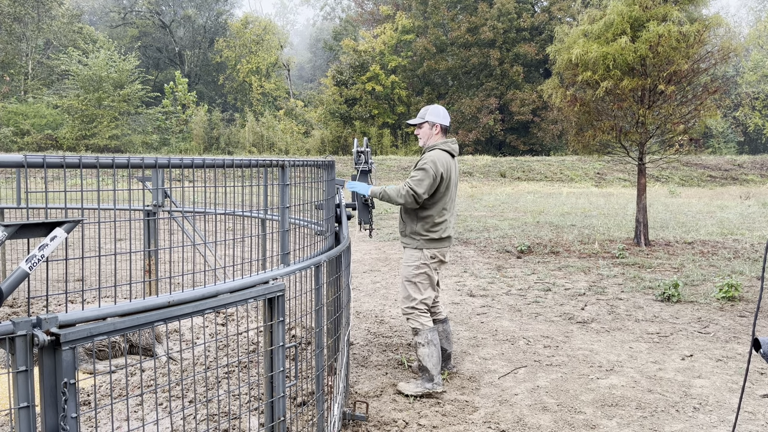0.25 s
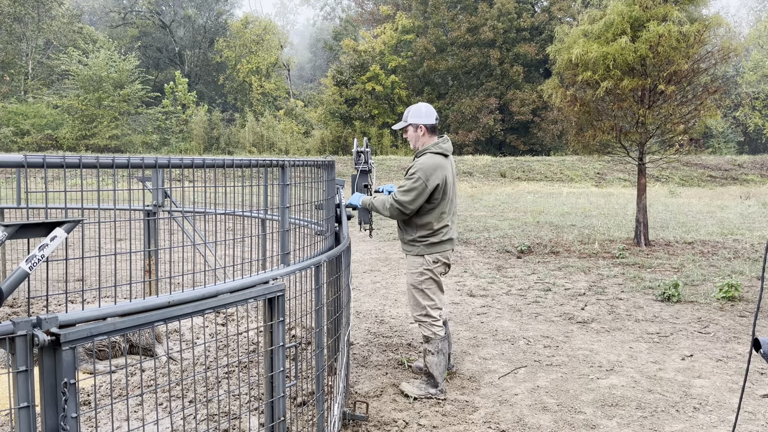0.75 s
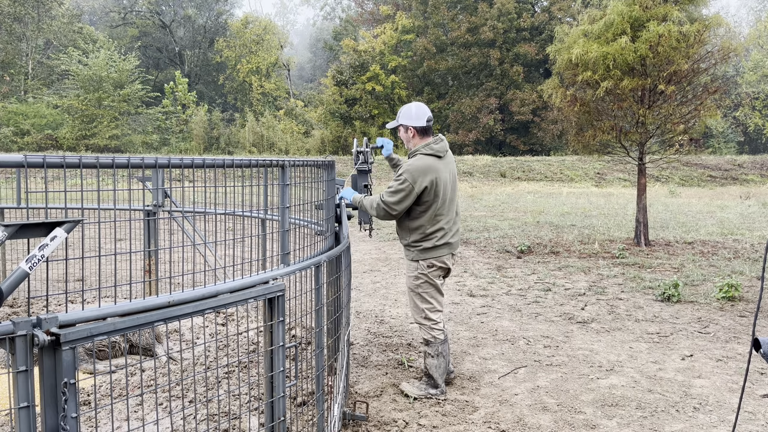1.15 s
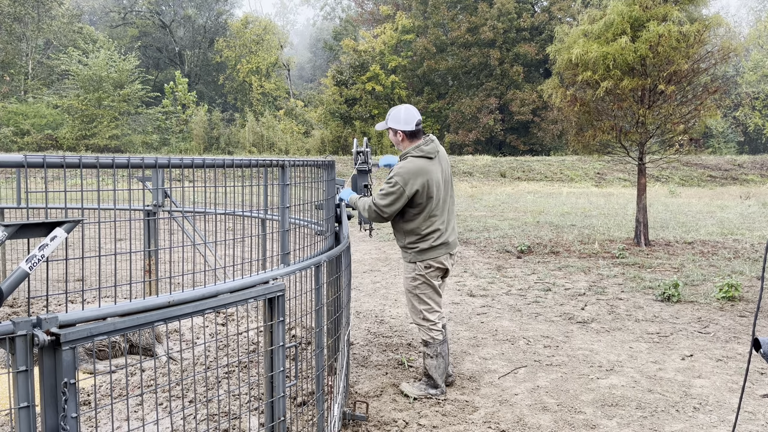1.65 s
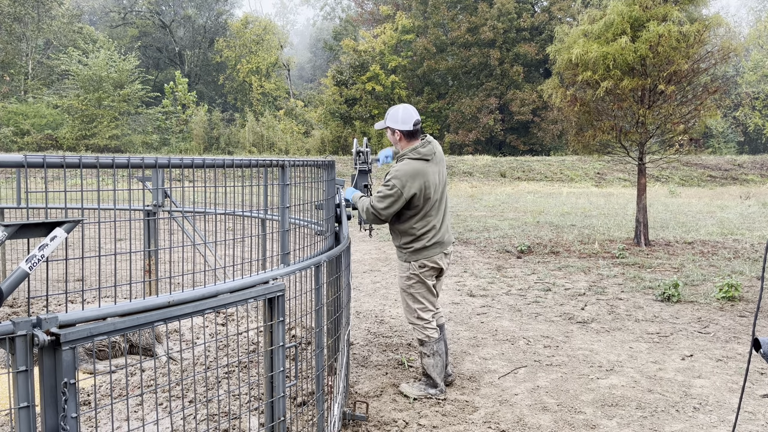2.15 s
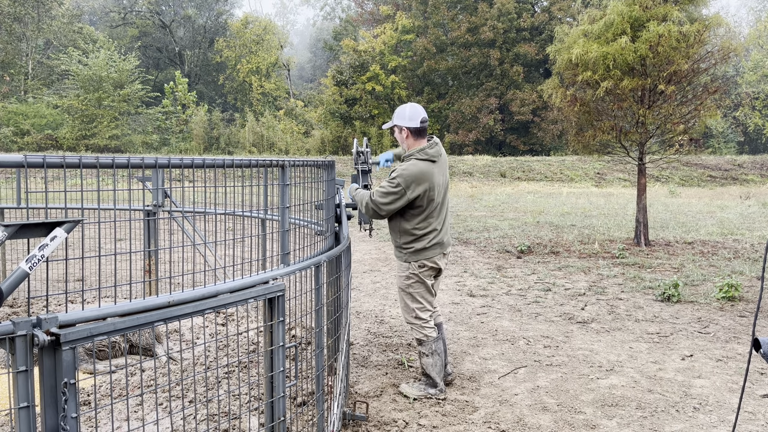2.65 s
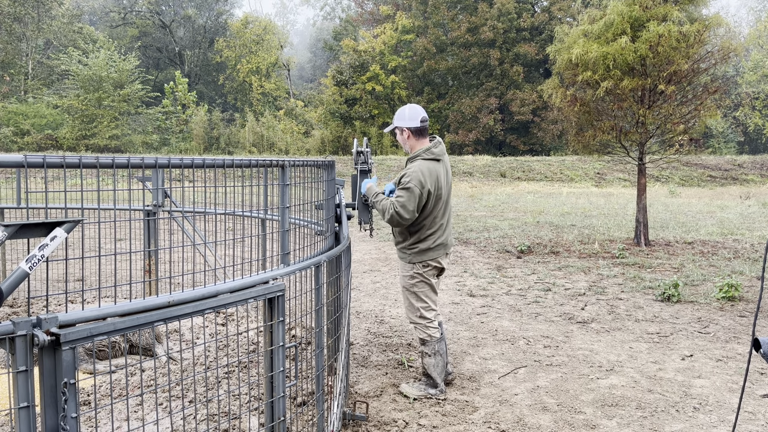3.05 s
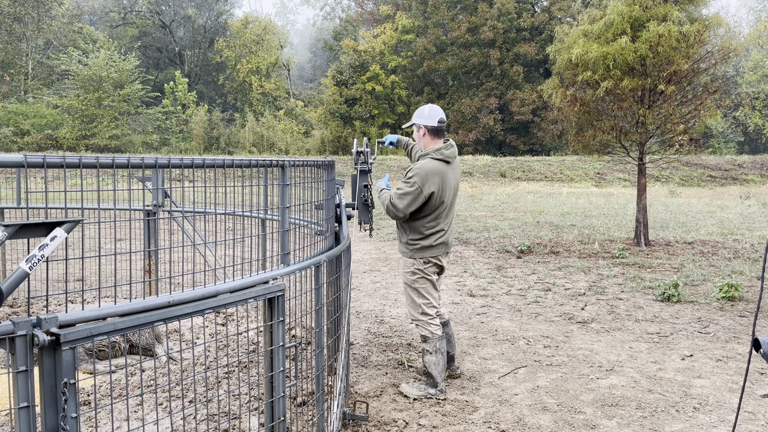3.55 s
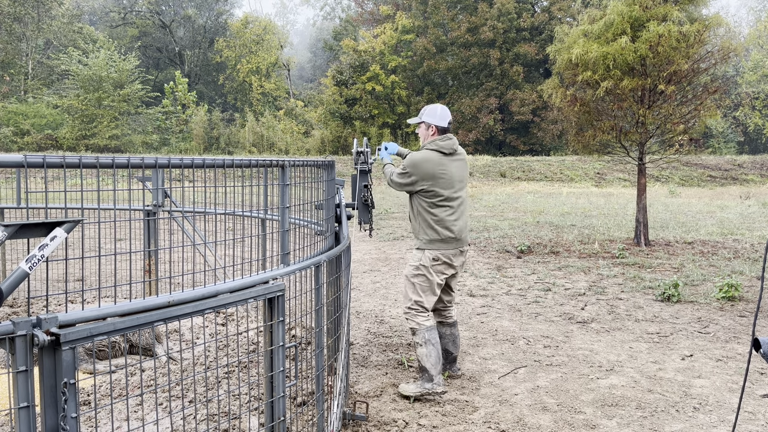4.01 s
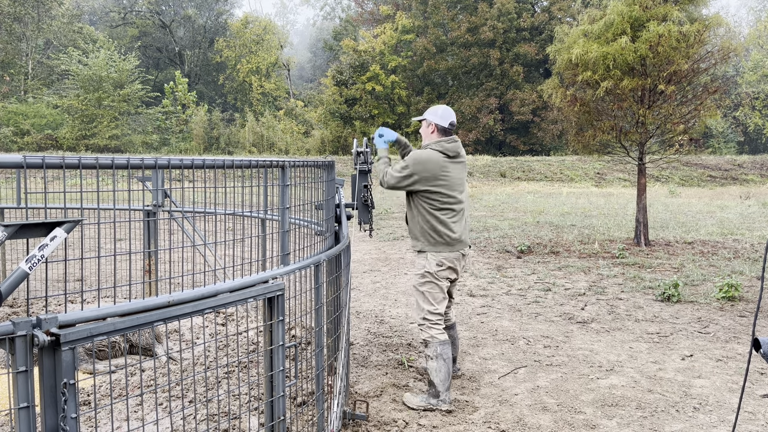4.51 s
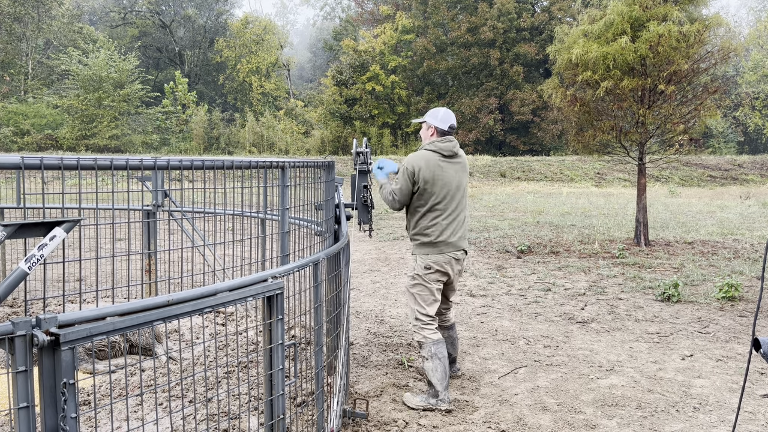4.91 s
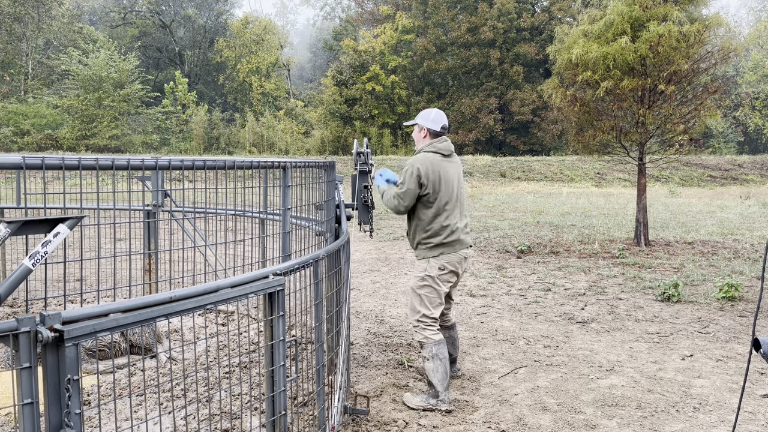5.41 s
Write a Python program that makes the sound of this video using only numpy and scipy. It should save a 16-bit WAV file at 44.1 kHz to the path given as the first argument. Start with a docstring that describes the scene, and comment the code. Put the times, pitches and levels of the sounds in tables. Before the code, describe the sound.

A hand winch on a steel pen gives one sharp metallic click, then a quickening run of ratchet clicks with a slight ring and a soft grinding beneath. It slows, pauses briefly and resumes a little louder, while a metal gate knocks and scrapes in its rails and the cable hums faintly. Light wind touches the microphone, and far insects sound faintly across the open field.

```python
"""Sharp metallic clicks, one alone and then a quickening run: a hand winch on a steel pen is cranked
in an open field. The pawl snaps over each ratchet tooth, and each impact excites the normal modes of
the frame and fence tubes, while the drum grinds with the speed. After a pause the cable takes the
gate's weight: the gate knocks and drags in its rails by stick-slip friction, and the cable hums.
Faint squeaks, a low rustle, light wind and a far insect chorus lie behind."""
import sys
import numpy as np
from scipy import signal
from scipy.fft import rfft, irfft, next_fast_len
from scipy.io import wavfile
from scipy.ndimage import uniform_filter1d

SR = 44100
rng = np.random.default_rng(int(sys.argv[2]) if len(sys.argv) > 2 else 0)


def to_wav(sig):
    """Store sig (one row per channel, or 1-D mono) as 16-bit WAV at the path in sys.argv[1].

    Samples outside -1..1 are clipped; the rate is SR.
    """
    pcm = np.clip(np.atleast_2d(sig), -1, 1) * 32767
    pcm = np.round(pcm).astype(np.int16)
    wavfile.write(sys.argv[1], SR, pcm.T)  # frames by channels


N = 250047

# Pawl drops: t/s, blow level/dB, clank level/dB
PAWL_DROPS = [(0.2857, -23, -37.5), (0.8812, -28.5, -40), (1.0356, -24.5, -34), (1.1412, -22.5, -31.5),
              (1.2245, -22.5, -29), (1.2933, -23.5, -29.5), (1.3569, -21.5, -31), (1.4138, -22.5, -28.5),
              (1.4628, -21.5, -33), (1.503, -23.5, -29.5), (1.5434, -24, -31.5), (1.592, -23, -31),
              (1.6477, -27, -36.5), (1.7078, -23.5, -33), (1.7654, -24.5, -30), (1.822, -24, -28),
              (1.8748, -22.5, -33), (1.9228, -21, -29.5), (1.965, -26.5, -30.5), (2.0051, -26, -29),
              (2.0458, -25, -33), (2.0918, -23.5, -31.5), (2.1399, -28.5, -30.5), (2.191, -24.5, -29),
              (2.2458, -23.5, -30.5), (2.2973, -22, -32), (2.3516, -25, -31), (2.4031, -22, -28.5),
              (2.4476, -22.5, -26.5), (2.489, -25.5, -27), (2.5327, -23, -29.5), (2.5851, -20.5, -28.5),
              (2.6418, -23, -25.5), (2.7049, -25.5, -28.5), (2.7725, -24.5, -29), (2.8297, -21.5, -29),
              (2.8887, -21.5, -27.5), (2.9439, -22.5, -30.5), (2.9893, -21.5, -31), (3.0284, -22, -33.5),
              (3.0677, -22.5, -35), (3.1099, -20.5, -29.5), (3.16, -25, -24.5), (3.2196, -22, -27),
              (3.2941, -23, -28), (3.3832, -24.5, -31), (3.5178, -23.5, -29.5), (4.0924, -22.5, -33),
              (4.1688, -49, -30.5), (4.2341, -21.5, -30), (4.2967, -21.5, -26), (4.3448, -20, -26),
              (4.3857, -22.5, -24.5), (4.4293, -22, -29), (4.4878, -19.5, -23), (4.5464, -17.5, -23.5),
              (4.5987, -20.5, -26), (4.6457, -17.5, -27), (4.6928, -19.5, -28.5), (4.7424, -19, -27),
              (4.7899, -20.5, -26.5), (4.8357, -18, -28), (4.8796, -20, -28), (4.9323, -18.5, -31),
              (4.9895, -19, -21), (5.0534, -20, -32.5), (5.1115, -20, -33), (5.166, -19, -29.5),
              (5.2173, -18, -28), (5.2635, -19, -30), (5.313, -19, -26.5), (5.3605, -19, -28),
              (5.4047, -17.5, -29), (5.454, -22, -32), (5.5132, -22, -30), (5.577, -21.5, -31.5),
              (5.6374, -26, -30)]
# Where the clank, blow, chime and tick of a drop lie: f/Hz
PAWL_BANDS = [1200, 3300, 4700, 9000]
# Modes of the winch frame and fence tubes: f/Hz, level/dB, T60/s
FRAME_MODES = [(531, -31.5, 0.58), (837, -12.5, 0.089), (966.4, 4, 0.037), (1085, -23.5, 0.86),
               (1203, 4, 0.033), (1462, -18.5, 0.2), (1512, 0, 0.063), (1647, -1, 0.052),
               (1993, -24.5, 0.36), (2026, -29, 0.28), (2355, -12.5, 0.14), (2677, -21.5, 0.26),
               (2873, -3, 0.052), (2988, 2, 0.046), (3232, -5, 0.089), (3285, 10.5, 0.04),
               (3387, 6.5, 0.034), (3612, -1.5, 0.051), (3980, -13.5, 0.11), (4295, 5, 0.032),
               (4674, -3.5, 0.053), (4600, -27, 0.54), (5530, -8.5, 0.054), (6340, -2, 0.049),
               (6560, -28, 0.27), (7520, 1.5, 0.023), (10100, -14, 0.052), (9650, -5, 0.03),
               (10530, -13, 0.13), (9700, -6, 0.037), (10930, -8, 0.082)]
# Noise bands of the snap: f/Hz, level/dB, rise/s, T60/s, relative fence tail level/dB, tail T60/s
SNAP_BANDS = [(676, -32.5, 0.0023, 0.042, -11.5, 0.49), (857, -13, 0.0012, 0.025, -17, 0.62),
              (1565, -4, 0.0018, 0.038, -35, 1), (2680, -12, 0.0023, 0.046, -22, 0.48),
              (2880, -17, 0.0023, 0.043, -17, 0.62), (4470, -6, 0.002, 0.044, -19.5, 0.39),
              (5980, -10.5, 0.00051, 0.029, -22.5, 0.2), (7620, -14, 0.00035, 0.046, -21, 0.44),
              (12540, -9, 0.00059, 0.028, -10.5, 0.084), (14360, -19.5, 0.001, 0.013, -16, 0.069),
              (15700, -46, 0.00048, .02, -25, .1)]
# Modes of the winch post: f/Hz, level/dB, T60/s
POST_MODES = [(1333, 0, 0.1), (1350, -10, 0.061)]
# Drops on which the post rings out clearly: t/s, level/dB
CLEAR_POST_RINGS = [(2.535, -36), (4.347, -37), (4.386, -33), (4.431, -26), (4.644, -32), (4.693, -27.5),
                    (4.791, -34), (4.988, -29), (5.166, -25.5), (5.218, -24.5), (5.266, -23.5),
                    (5.361, -37), (5.404, -25.5), (5.575, -27.5)]
# Knocks of the gate against its rails: t/s, level/dB, relative scrape level/dB
GATE_KNOCKS = [(4.065, -55, 10), (4.275, -29, -2), (4.34, -19, -9), (4.377, -15.5, -10), (4.39, -18.5, -9),
               (4.46, -33, 12), (4.494, -16, -25), (4.51, -28, -17), (4.524, -24, -26), (4.553, -18, -12),
               (4.567, -20, -18), (4.584, -21, -33), (4.9875, -15.5, -10), (5.002, -47, -13),
               (5.273, -27.5, 0)]
# Modes of the gate tubes: f/Hz, level/dB, T60/s
GATE_MODES = [(142, -34, 0.075), (575, -16.5, 0.057), (687, -3.5, 0.028), (892, -6, 0.11),
              (1000, -15, 0.18), (1350, 0, 0.027), (1432, -3, 0.053), (1750, -2.5, 0.032)]
# Drags of the gate in its rails: t/s, swell/s, hold/s, level/dB, roughness (0-1)
GATE_DRAGS = [(4.243, 0.15, 0.15, -33, 0.6), (4.982, 0.0055, .01, -34.5, .05)]
# Resonances of a fence tube and the taut cable: f/Hz, bandwidth/Hz
HUM_RESONANCES = [(599, 3), (187, 10)]
# Squeaks: t/s, length/s, turning-point f/Hz, level/dB, relative second harmonic level/dB,
# skew of the arch (1 = symmetric), share of pitch lost at the ends
SQUEAK_ARCHES = [(.59, .09, 1340, -58, -30, .6, .15), (.942, .07, 1410, -55, -30, .8, .15),
                 (3.63, .07, 760, -55, -5, 1.1, -.03)]

# Envelopes: t/s, level/dB
TUBE_ENVELOPE = [(0.75, -82), (0.93, -65.5), (1.27, -67.5), (1.32, -56), (1.43, -53), (1.76, -70.5),
                 (2.11, -52.5), (2.26, -64.5), (3.28, -54), (3.7, -69.5), (3.94, -95), (4.31, -74),
                 (4.34, -49.5), (4.92, -56), (5.61, -61.5), (5.67, -48)]
CABLE_ENVELOPE = [(4.15, -86), (4.416, -51), (4.492, -60), (4.564, -55.5), (4.864, -80), (5.194, -63),
                  (5.232, -78), (5.67, -57.5)]
RUSTLE_ENVELOPE = [(0.7, -77.5), (1.45, -56), (1.81, -66), (2.9, -72.5), (3.19, -58.5), (3.66, -85),
                   (4.09, -87), (4.42, -51), (4.88, -64), (5.28, -56), (5.67, -62.5)]
WIND_ENVELOPE = [(0.0, -73.5), (0.68, -73), (0.85, -66), (1.34, -60.5), (1.4, -65), (1.45, -80),
                 (2.32, -68.5), (2.38, -76), (3.03, -70.5), (3.92, -78.5), (4.33, -56.5), (4.59, -56),
                 (4.88, -71), (5.45, -61.5), (5.67, -68)]

# Noise spectra: f/Hz, relative spectral level/dB
DRAG_SPECTRUM = [(65, -43), (110, -55), (358, -14.5), (708, -1.5), (1120, -1.5), (1370, 3), (2020, -0.5),
                 (2140, -7), (4000, -9.5), (5180, -36), (9000, -38), (11700, -57), (19800, -120)]
GRIND_SPECTRUM = [(280, -82), (480, -5), (672, -24.5), (1020, -2), (2670, 3), (3300, 7.5), (3860, -12.5),
                  (6330, -28), (7000, -22), (9100, -52), (15400, -120)]
RUSTLE_SPECTRUM = [(150, -4), (230, -3), (450, -1), (600, 2.5), (900, -70)]
WIND_SPECTRUM = [(25, -42), (40, -5), (55, 1), (80, -2.5), (110, -8), (200, -17), (350, -15.5), (460, -16),
                 (770, -120)]
AIR_SPECTRUM = [(180, -49), (300, -25), (419, -16), (714, -12.5), (1300, -2.5), (2600, -14), (3380, -23),
                (5720, -120)]
# Bands of the far insects: f/Hz, width/Hz, relative spectral level/dB
INSECT_BANDS = [(3315, 380, 0.5), (4880, 420, -1), (5400, 1270, -6), (11000, 3300, -28.5)]

# Likeness of the two microphone ports: f/Hz, coherence (0-1)
PORT_COHERENCE = [(60, .93), (300, .88), (700, .75), (1400, .6), (2200, .65), (3300, .82), (5200, .6),
                  (6500, .8), (7600, .5), (9800, .7), (11800, .95), (14000, .5)]
# Lead of the left port: f/Hz, phase/rad
PORT_PHASE = [(20, 0), (700, .2), (2000, .5), (3300, 1.2), (4800, 1.0), (5500, 0), (7000, -.5), (8000, -3),
              (8900, -4.9), (10000, -4.3), (10800, -6.1), (12500, -6.4), (13600, -7.2), (14600, -9.4)]
# Balance of the ports: f/Hz, left minus right level/dB
PORT_BALANCE = [(60, 2.4), (600, 3), (1500, 1.5), (3000, 1.8), (4200, 3.5), (5800, 0), (7500, 4.5),
                (8900, 4.5), (9500, -3.5), (10500, 1), (11500, 0)]

USUAL_TEETH_PER_S, USUAL_BLOW_DB = 20, -21.5


def pawl():
    """Impact excitation: each drop gives a noisy snap and sets the frame and post in free vibration."""
    t = np.arange(12288) / SR
    times, blow, clank = np.transpose(PAWL_DROPS)
    # Faster cranking and harder blows strengthen the treble; levels in dB.
    faster, harder = crank_speed(times) - USUAL_TEETH_PER_S, blow - USUAL_BLOW_DB
    chime = -24.5 + 0.22 * faster + 0.69 * harder
    tick = -29.5 + 0.28 * faster + 0.27 * harder
    chime, tick = [chime, tick] + rng.standard_normal((len(times), 2)).T
    post_db = -43.5 + 4 * rng.standard_normal((len(times), 1))
    drop_db = np.c_[clank, blow, chime, tick]
    mode_hz = np.array(FRAME_MODES)[:, 0]
    rises = at_hz(np.array(SNAP_BANDS)[:, [0, 2]], mode_hz)  # each mode swells as fast as its band
    frame = modal_ring(FRAME_MODES, excitation(drop_db, mode_hz) - 3.5, t, rises,
                       scatter_db=2, detune=0.99)
    faint_post = modal_ring(POST_MODES, post_db, t, [.002, .002], scatter_db=5, detune=0.38)
    return placed(times - .0006, frame + faint_post + pawl_snap(drop_db, t))


def pawl_snap(drop_db, t):
    """Broadband transient: each band dies quickly and leaves a slower, resonant tail in the fence."""
    hz, centres = np.fft.rfftfreq(len(t), 1 / SR), np.array(SNAP_BANDS)[:, 0]
    noise = rfft(rng.standard_normal((len(drop_db), 2, len(t))).transpose(1, 0, 2))
    noise[..., (hz < 350) | (hz > 17000)] = 0
    fence = 1.13 + sum(1 / (1 + ((hz - f) / 25) ** 2) for f, _, _ in FRAME_MODES)
    out = 0
    for k, (f, db, rise, t60, tail_db, tail_t60) in enumerate(SNAP_BANDS):
        share = at_hz(np.c_[centres, np.arange(len(centres)) == k], hz)  # neighbouring bands overlap
        band = noise * np.sqrt(share)
        snap = unit_rms(irfft(band)) * strike(t, rise, t60)
        tail = unit_rms(irfft(band * fence)) * strike(t, rise, tail_t60)
        out += amp(excitation(drop_db, np.array([f])) + db + 5) * (snap + amp(tail_db) * tail)
    return out


def excitation(drop_db, hz):
    """Excitation spectrum: the level/dB of each drop at hz, interpolated between its four bands."""
    return np.array([at_hz(np.c_[PAWL_BANDS, levels], hz) for levels in drop_db])


def crank_speed(t):
    """Rate as reciprocal period: teeth a second, from the gap between the drops either side of t."""
    times = np.array(PAWL_DROPS)[:, 0]
    return np.r_[1, 1 / np.diff(times), USUAL_TEETH_PER_S][np.searchsorted(times, t)]


def post():
    """Free vibration: on some drops two close modes of the winch post ring out clearly."""
    rows, t = np.array(CLEAR_POST_RINGS), np.arange(12288) / SR
    ring = modal_ring(POST_MODES, rows[:, 1:], t, [.002, .002], scatter_db=0, detune=0.43)
    return placed(rows[:, 0], ring)


def gate_knocks():
    """Impact on damped tubes: each dull knock rings the gate's modes and adds a short scrape."""
    rows, t = np.array(GATE_KNOCKS), np.arange(8192) / SR
    times, knock_db, scrape_db = rows[:, 0], rows[:, 1:2], rows[:, 2:3]
    ring = modal_ring(GATE_MODES, knock_db - 6, t, [.0007] * len(GATE_MODES), scatter_db=2.5, detune=.5)
    noise = rng.standard_normal((len(rows), 2, len(t))).transpose(1, 0, 2)
    band = signal.sosfilt(signal.butter(2, [900, 6000], "band", fs=SR, output="sos"), noise)
    scrape = band * amp(knock_db + scrape_db) * strike(t, rise=0.0011, t60=0.14)
    return placed(times - .001, ring + scrape)


def gate_drag():
    """Stick-slip friction: noise broken into uneven jolts; each drag swells, holds and fades."""
    start_db, fall_db_per_s = -23, 115
    slips = jolts(per_s=330, spread_db=3.5, fade_s=0.0074)
    t, level = np.arange(N) / SR, 0
    for start, rise, hold, db, rough in GATE_DRAGS:
        swell_db = start_db * np.clip(1 - (t - start) / rise, 0, 1)
        fade_db = fall_db_per_s * np.maximum(t - start - rise - hold, 0)
        level += amp(db + swell_db - fade_db) * (t > start) * (1 - rough + rough * slips)
    return level * hiss(DRAG_SPECTRUM, patchy_db=1.5)


def drum_grind():
    """Friction noise of drum and cable: it grows with speed and settles when the crank stops."""
    db_per_doubling, settle_db_per_s, smooth_s = 8.5, 50, 0.11
    t = np.arange(N) / SR
    doublings = uniform_filter1d(np.log2(crank_speed(t) / USUAL_TEETH_PER_S), round(smooth_s * SR))
    level_db = -47 + db_per_doubling * doublings
    settled_db = np.maximum.accumulate(level_db + settle_db_per_s * t) - settle_db_per_s * t
    rattle = .5 + .5 * jolts(per_s=270, spread_db=-1.5, fade_s=.004)
    return amp(settled_db) * rattle * hiss(GRIND_SPECTRUM, patchy_db=4.5)


def tube_and_cable():
    """Forced resonance: random shaking keeps a fence tube and the taut cable humming."""
    out, t = 0, np.arange(N) / SR
    for levels, (hz, width) in zip((TUBE_ENVELOPE, CABLE_ENVELOPE), HUM_RESONANCES):
        shake = rng.standard_normal((N, 2, 2)).T
        slow = signal.lfilter([1], [1, -np.exp(-np.pi * width / SR)], shake[0] + 1j * shake[1])
        steady = slow / (abs(slow) + 0.4 * np.std(slow))  # the ring rarely dies out
        out += envelope(levels) * unit_rms((steady * np.exp(2j * np.pi * hz * t)).real)
    return out


def squeaks():
    """Frequency and amplitude modulation: brief tones glide along an arch, fuzzy with random wobble."""
    out = 0
    for start, length, turning_hz, db, overtone_db, skew, sag in SQUEAK_ARCHES:
        along = np.clip((np.arange(N) / SR - start) / length, 0, 1)
        off_peak = 1 - np.sin(np.pi * along ** skew)
        wobble, flutter = uniform_filter1d(rng.standard_normal((N, 2)), size=200, axis=0).T
        hz = turning_hz * (1 - sag * off_peak) * (1 + .15 * wobble)
        phase = 2 * np.pi * np.cumsum(hz) / SR
        tone = np.sin(phase) + amp(overtone_db) * np.sin(2 * phase)
        level = amp(db - 11 * off_peak) * (along > 0) * (along < 1)
        out += level * tone * amp(3.8 * unit_rms(flutter))
    return out


def rustle():
    """Amplitude-modulated noise: a low rustle comes and goes during the cranking."""
    return envelope(RUSTLE_ENVELOPE) * hiss(RUSTLE_SPECTRUM, patchy_db=2.7)


def wind():
    """Low-frequency pressure fluctuation: light wind and handling rumble at the microphone."""
    return envelope(WIND_ENVELOPE) * hiss(WIND_SPECTRUM, patchy_db=1.8)


def insects():
    """Incoherent addition: the broad bands of a far chorus and dull air noise sum in power."""
    hz = np.geomspace(150, 17000, num=200)
    chorus = sum(amp(2 * db) * np.exp(-((hz - f) / width) ** 2 * 2) for f, width, db in INSECT_BANDS)
    air = amp(2 * (at_hz(AIR_SPECTRUM, hz) - 5.5))
    spectrum = np.c_[hz, 10 * np.log10(chorus + air + 1e-9)]
    return amp(-57) * hiss(spectrum, patchy_db=2.8)


def modal_ring(modes, blow_db, t, rises, scatter_db, detune):
    """Modal superposition: damped sinusoids whose strength and phase vary from blow to blow."""
    hz, db, t60 = np.transpose(modes)
    chance = rng.standard_normal((len(blow_db), len(hz), 3))
    phasors = np.exp(2j * np.pi * chance[..., 1:]).transpose(2, 0, 1)
    gains = amp(blow_db + db + scatter_db * chance[..., 0]) * phasors
    fades = np.array([strike(t, rise, decay) for rise, decay in zip(rises, t60)])
    out = np.zeros((2, len(blow_db), len(t)))
    # Six kinds of contact shift the modes in proportion to their bandwidth.
    for k, shift in enumerate(rng.standard_normal((6, len(hz)))):
        pitch = hz + detune * shift * 2.61 / t60
        out[:, k::6] = (gains[:, k::6] @ (fades * np.exp(2j * np.pi * pitch[:, None] * t))).real
    return out


def strike(t, rise, t60):
    """Delayed onset and damping: slow waves arrive late and steeply, then fall 60 dB in t60."""
    return (1 - np.exp(-1.4 * t / rise)) ** 6 * amp(-60 * t / t60)


def jolts(per_s, spread_db, fade_s):
    """Shot noise: randomly timed bumps of uneven height, each decaying exponentially."""
    slips = (rng.random(N) < per_s / SR) * amp(spread_db * np.minimum(rng.exponential(1, N), 4))
    return unit_rms(signal.lfilter([1], [1, -np.exp(-1 / (fade_s * SR))], slips))


def hiss(spectrum, patchy_db):
    """Spectral shaping: two uncorrelated noises share one spectrum with drifting patches of level."""
    frames, hz = N // 256 + 5, np.fft.rfftfreq(1024, 1 / SR)
    a, b, c, d, patches = rng.standard_normal((frames, 513, 5)).T
    patches = unit_rms(uniform_filter1d(uniform_filter1d(patches, size=10, axis=0), size=14, axis=1))
    gain = amp(at_hz(spectrum, hz)[:, None] + patchy_db * patches)
    shaped = np.array([a + 1j * b, c + 1j * d]) * gain
    return unit_rms(signal.istft(shaped, nperseg=1024, noverlap=768)[1][:, :N])


def placed(times, sounds):
    """Linear superposition of sounds (2, events, samples), each at its time."""
    out = np.zeros((2, N + sounds.shape[2]))
    for k, start in enumerate(times):
        out[:, round(start * SR):][:, :sounds.shape[2]] += sounds[:, k]
    return out[:, :N]


def envelope(points):
    """Gain per sample, interpolated in decibels and silent outside the table."""
    times, db = np.transpose(points)
    return amp(np.interp(np.arange(N) / SR, times, db, left=-150, right=-150))


def at_hz(points, hz):
    """Interpolation on a logarithmic frequency axis."""
    f, value = np.transpose(points)
    return np.interp(np.log(hz + 1), np.log(f + 1), value)


def amp(db):
    """Amplitude ratio of a level in decibels."""
    return 10 ** (np.asarray(db) / 20)


def unit_rms(x):
    """Normalisation to unit mean power."""
    return x / np.sqrt(np.mean(x ** 2) + 1e-20)


def microphone_ports(pair):
    """Partial coherence: the right port hears a phase-shifted share of the left plus unrelated sound."""
    size = next_fast_len(N + 4096)
    hz = np.fft.rfftfreq(size, 1 / SR)
    left, unrelated = rfft(pair, size)
    coherence, tilt = at_hz(PORT_COHERENCE, hz), amp(at_hz(PORT_BALANCE, hz) / 2)
    lag = np.interp(hz, *np.transpose(PORT_PHASE))
    right = (coherence * left + np.sqrt(1 - coherence ** 2) * unrelated) * np.exp(-1j * lag)
    return irfft(np.array([left * tilt, right / tilt]), size)[:, :N]


def scene():
    """Superposition: near sounds are partly coherent between the channels, the insects uncorrelated."""
    winch = pawl() + post() + gate_knocks() + gate_drag() + tube_and_cable() + squeaks() + drum_grind()
    return microphone_ports(winch + rustle() + wind()) + insects() * amp([[.8], [-.8]])


def record(dry):
    """Band limiting: the microphone's bass cut at 45 Hz, then a steep low-pass at 16.6 kHz."""
    cut = signal.sosfilt(signal.butter(3, 45, "high", fs=SR, output="sos"), dry)
    low_pass = signal.firwin(511, 16600, window=("kaiser", 9), fs=SR)
    return signal.oaconvolve(cut, low_pass[None], "same")


dry = scene()
out = record(dry)
to_wav(out)
```